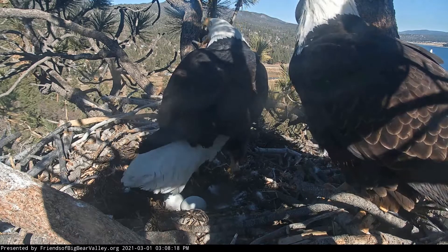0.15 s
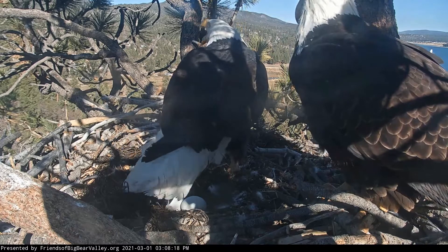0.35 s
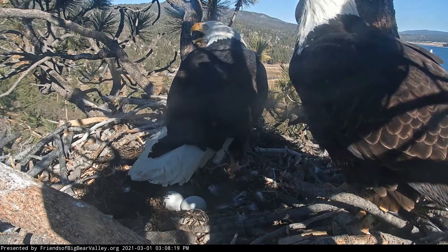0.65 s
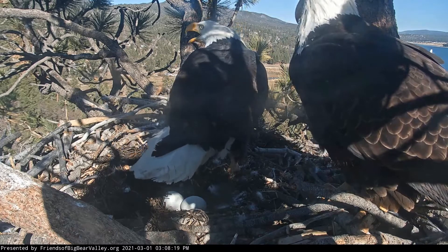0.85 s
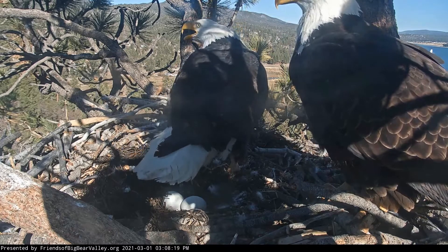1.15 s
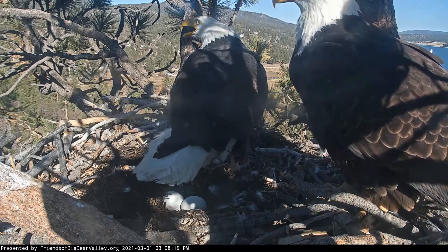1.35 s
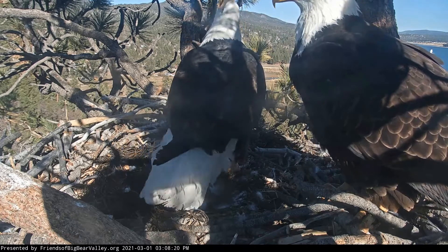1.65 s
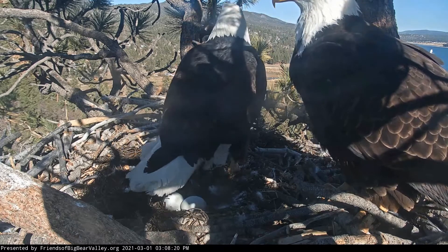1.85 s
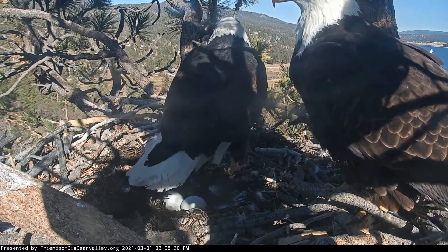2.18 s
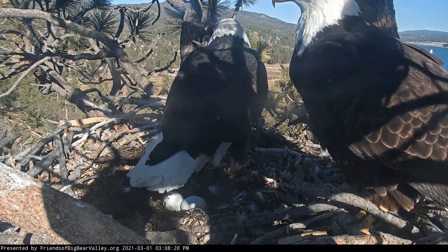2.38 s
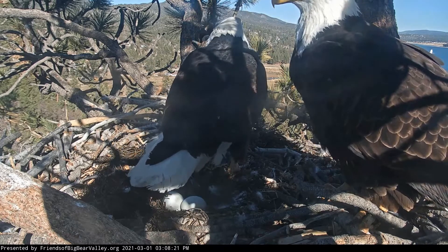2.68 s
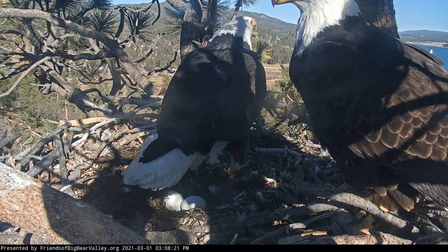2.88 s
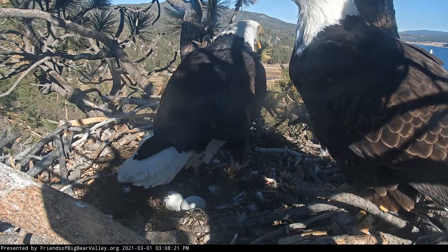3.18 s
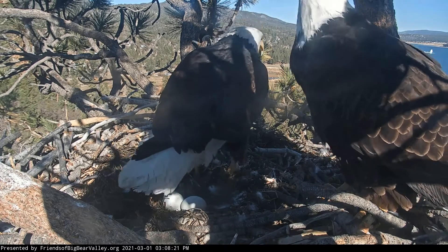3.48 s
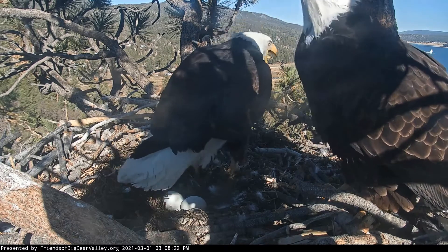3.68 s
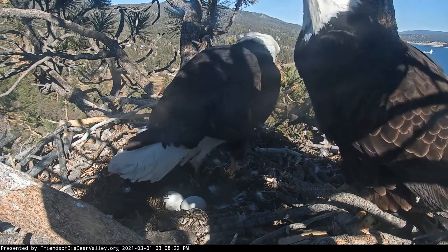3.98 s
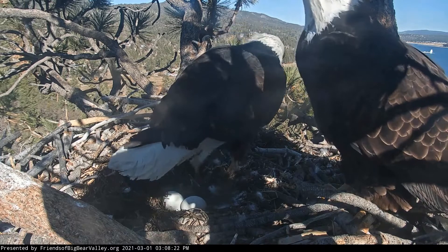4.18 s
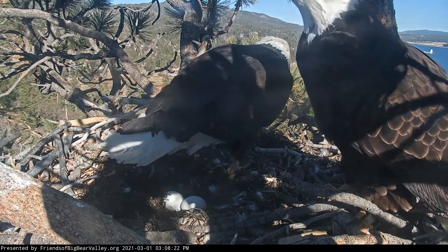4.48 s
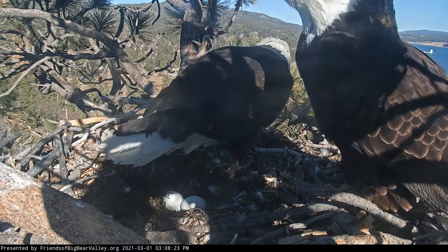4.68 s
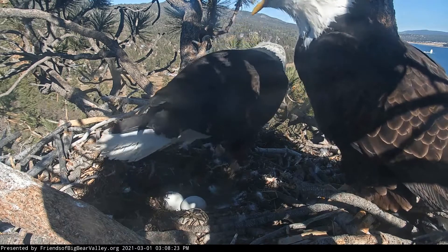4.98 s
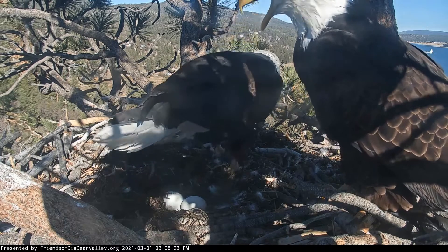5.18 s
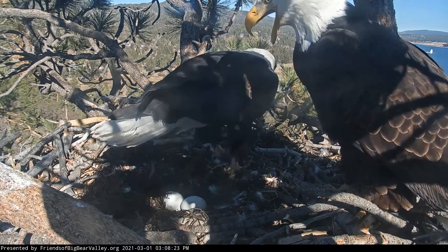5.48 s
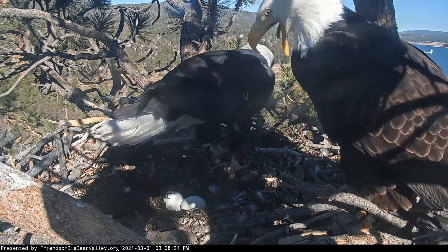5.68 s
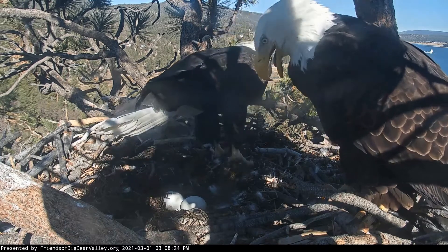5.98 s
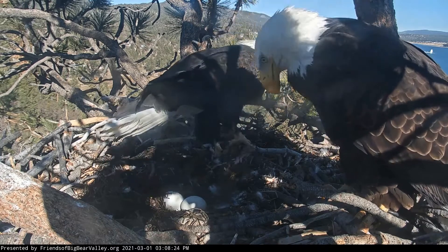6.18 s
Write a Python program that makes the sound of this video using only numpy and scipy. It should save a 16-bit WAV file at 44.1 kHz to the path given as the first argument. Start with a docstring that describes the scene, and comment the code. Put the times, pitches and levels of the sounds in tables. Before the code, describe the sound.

Two bald eagles calling very close in four bursts: piercing pipes, raspy chitters, squeals, low clucks, then loud falling yelps over faint outdoor breeze.

```python
"""Two bald eagles at the nest

Two bald eagles call in four bursts right beside a microphone: pipes, chitters, clucks, squeals and yelps.
Vibrating membranes give the whistles, chopped noise the rasps, short ringing puffs the throat clicks.
Loud calls overload the microphone, which adds hard, mostly odd overtones.
The nest gives short reflections, the forest a faint long echo; a faint far whistle, low breeze and hiss join."""
import sys
import numpy as np
from scipy import signal
from scipy.fft import rfft, irfft
from scipy.io import wavfile

SR = 44100
rng = np.random.default_rng(int(sys.argv[2]) if len(sys.argv) > 2 else 0)


def persist_wave(psi):
    """Save psi, clipped to +-1, as 16-bit WAV."""
    counts = np.round(np.clip(psi, -1, 1) * 32767).astype(np.int16)
    wavfile.write(sys.argv[1], SR, np.atleast_2d(counts).T)


N = 279594

# relative spectra of a rasp's two colours: (frequency [Hz], density [dB per Hz])
GROWL_COLOUR = [(60, -25.5), (180, -14), (500, -10), (1000, -12.5), (1500, -3), (2300, -5.5), (3100, -1.5),
                (3700, -15.5), (5000, -42), (8000, -27.5), (10000, -36.5), (16000, -31.5)]
HISS_COLOUR = [(1000, -37.5), (3500, -7.5), (5000, -1), (6100, 0), (7200, -3), (8000, -19.5), (9000, -40.5),
               (11000, -50), (16000, -43)]


def amp(db):
    """Decibels to gain."""
    return 10 ** (np.asarray(db) / 20)


def unit(x):
    """Scales to rms 1."""
    return x / np.sqrt(np.mean(x ** 2) + 1e-20)


def read(points, hz):
    """Interpolates a table on a log-frequency axis."""
    f, value = np.transpose(points)
    return np.interp(np.log(hz + 1), np.log(f + 1), value)


def add(mix, start_s, sound):
    """Lays a sound into the mix at start_s."""
    part = mix[round(start_s * SR):][:len(sound)]
    part += sound[:len(part)]


def shaped(x, gain):
    """Filters x by gain(Hz), to rms 1."""
    spectrum = rfft(x) * gain(np.fft.rfftfreq(len(x), 1 / SR))
    return unit(irfft(spectrum, len(x)))


def noise(gain, size=8192):
    """Noise of rms 1 whose spectrum follows gain(Hz)."""
    return shaped(rng.standard_normal(size), gain)


def wobble(rate_hz, size=8192):
    """Random motion of rms 1, mostly slower than rate_hz."""
    return noise(lambda f: 1 / (1 + (f / rate_hz) ** 4), size)


def air(air_db, gust_db):
    """A low breeze with an even hiss above it; only the low part follows the gusts."""
    # relative spectrum: (frequency [Hz], density [dB per Hz])
    air_colour = [(15, -56.5), (30, -46), (60, -16.5), (115, -3), (170, -1), (250, -7), (450, -8),
                  (700, -10.5), (1200, -21.5), (2200, -23.5), (4500, -29.5), (8000, -24.5), (13300, -23),
                  (15000, -43.5)]
    # left-right likeness: (frequency [Hz], correlation [0-1])
    air_likeness = [(60, 0.98), (180, 1.0), (550, 0.99), (1650, 1), (4970, 1), (15000, 0.89)]
    # (time [s], level [dB])
    air_level = [(0, -45), (1.3, -47.5), (2.501, -46), (3.101, -47), (4.7, -46), (6.34, -45.5)]
    first, second = (noise(lambda f: amp(read(air_colour, f)), size=N) for _ in range(2))
    alike = np.clip(read(air_likeness, np.fft.rfftfreq(N, 1 / SR)), -1, 1)
    right = irfft(alike * rfft(first) + np.sqrt(1 - alike ** 2) * rfft(second), N)
    both = np.array([first, right])
    level_db = np.interp(np.arange(N) / SR, *np.transpose(air_level))
    breeze = signal.sosfilt(signal.butter(1, 800, fs=SR, output="sos"), both)
    gust_gain = amp(gust_db * wobble(rate_hz=6, size=N))
    return amp(air_db + level_db) * (both + (gust_gain - 1) * breeze)


def far_whistle(waver=0.0053):
    """A faint, slowly rising sine in the distance; its pitch wavers by a small rms share."""
    # (time [s], pitch [Hz])
    far_pitch = [(3.039, 2490), (3.15, 2630), (3.38, 2700)]
    s, hz = np.transpose(far_pitch)
    t = np.arange(N) / SR
    pitch_hz = np.interp(t, s, hz) * (1 + waver * wobble(rate_hz=60, size=N))
    level = amp(-62) * np.interp(t, s, [0, 2, 0])
    return level * np.sin(2 * np.pi * np.cumsum(pitch_hz) / SR)


def surroundings(voice, nest_db, nest_t60_s, forest_db, apart):
    """Sticks and trunk scatter the calls at once; the forest returns them for a second or two."""
    # (frequency [Hz], time to decay by 60 dB [s])
    forest_t60 = [(200, .8), (1100, 1.1), (2200, 1.9), (3100, 2.22), (4000, 2.4), (6000, 0.36),
                  (12000, 0.2)]
    taps = rng.standard_normal((3, 2 * SR))
    taps = taps[0] + apart * taps[1:]  # left and right share most reflections
    t = np.arange(2 * SR) / SR
    nest = taps * amp(-60 * t / nest_t60_s) * (t > .002)

    hz, frame_s, z = signal.stft(taps, SR, nperseg=256)
    decay = amp(-60 * frame_s / read(forest_t60, hz)[:, None])
    forest = signal.istft(z * decay, SR, nperseg=256)[1][:, :len(t)]
    forest *= 1 - np.exp(-t / 0.077)  # builds up gradually

    echo = amp(nest_db) * nest / np.linalg.norm(nest[0])
    echo = echo + amp(forest_db) * forest / np.linalg.norm(forest[0])
    return signal.fftconvolve(voice[None], echo, axes=1)[:, :N]


def swell(length_s, swell_db, rise_s, fall_s):
    """Air pressure through one syllable: soft start, steady swell or fade in dB, soft stop."""
    t = np.arange(min(round(length_s * SR), 8192)) / SR
    ramps = np.array([np.clip(t / rise_s, 0, 1), np.clip((length_s - t) / fall_s, 0, 1)])
    return amp(swell_db * (t / length_s - .5)) * np.prod(np.sin(np.pi / 2 * ramps) ** 2, axis=0)


def membrane(pitch_hz, rough, even_db=0, breath_db=-27, twist_rad=0.87, side_db=-27, side_ratio=1.19):
    """A membrane follows a pitch curve; roughness shakes pitch and strength and lets air leak past."""
    # the throat's weighting of overtones: (frequency [Hz], gain [dB])
    throat = [(500, -3), (750, -6), (1050, -6.5), (1550, 8.5), (2150, -5.5), (3100, -10), (4200, -18),
              (6000, -33), (8000, -45), (11000, -57.5), (16000, -108.5)]
    n = len(pitch_hz)
    k = np.arange(1, 8)[:, None]  # fundamental and six overtones
    jitter = 0.076 * rough * wobble(rate_hz=644)[:n]
    jitter = jitter + (0.0066 + 0.021 * rough) * wobble(rate_hz=160)[:n]
    phase = 2 * np.pi * np.cumsum(pitch_hz * (1 + jitter)) / SR

    lag = twist_rad + 0.27 * wobble(rate_hz=120)[:n]  # overtones lag the fundamental: a lopsided wave
    weight = amp(read(throat, k * pitch_hz) + even_db * (k % 2 == 0)) * (k * pitch_hz < SR / 2)
    tone = np.sum(weight * np.sin(k * phase - (k - 1) * lag), axis=0) / np.linalg.norm(weight, axis=0)
    flutter = amp((-0.87 + 3.24 * rough) * wobble(rate_hz=280)[:n])

    # the other membrane trembles a little higher
    side_tone = amp(side_db) * wobble(rate_hz=200)[:n] * np.sin(side_ratio * phase)
    breath = noise(lambda f: amp(read(GROWL_COLOUR, f)) + 0.24 * amp(read(HISS_COLOUR, f)))[:n]
    return unit(tone * flutter) + side_tone + amp(breath_db + 16.6 * rough) * breath


def whistle(length_s, hz, glide, db, swell_db, rough, arch=0.015, even_db=0, scoop=0, quaver=0,
            rise_s=0.01, fall_s=0.016, side_db=-27):
    """One note glides through hz and sags at both ends; glide, arch, scoop, quaver are shares of pitch."""
    pressure = swell(length_s, swell_db, rise_s / (1 + 3 * rough), fall_s)
    t = np.arange(len(pressure)) / SR
    u = np.linspace(-1, 1, len(pressure))
    bend = glide * u / 2 - arch * u ** 2
    bend = bend - scoop * np.exp(-t / .003)  # hooks up to pitch
    bend = bend + quaver * np.sin(2 * np.pi * 55.2 * t)
    return amp(db) * pressure * membrane(hz * (1 + bend), rough, even_db, side_db=side_db)


def flapping(colour, n, depth_db, rate_hz, ripple_db=4):
    """Air chopped by irregular flaps, through a throat whose narrow resonances differ each time."""
    chopped = rng.standard_normal(8192) * amp(depth_db * np.tanh(wobble(rate_hz)))
    ripple = rng.standard_normal(64)
    ripple_hz = np.linspace(0, SR / 2, len(ripple))

    def throat_gain(f):
        """The colour in dB with random resonances on top."""
        return amp(read(colour, f) + ripple_db * np.interp(f, ripple_hz, ripple))

    return unit(shaped(chopped, throat_gain)[:n])


def rasp(length_s, growl_db, hiss_db, swell_db):
    """A toneless syllable: a coarse growl with a high hiss, both of chopped air."""
    pressure = swell(length_s, swell_db, rise_s=.005, fall_s=0.014)
    growl = flapping(GROWL_COLOUR, len(pressure), depth_db=10, rate_hz=140, ripple_db=5)
    hiss = flapping(HISS_COLOUR, len(pressure), depth_db=5, rate_hz=150, ripple_db=4)
    return pressure * (amp(growl_db) * growl + amp(hiss_db) * hiss)


def click(db, centre_hz, decay_s, sharpness=1.16, top_hz=3700, muffle_hz=4600):
    """A puff that rings briefly in the throat, which muffles its sharp start."""
    def ring(f):
        """A resonance at centre_hz, cut above top_hz."""
        return 1 / (1 + (sharpness * np.log((f + 1) / centre_hz)) ** 2) ** 2 / (1 + (f / top_hz) ** 8)

    puff = noise(ring)
    t = np.arange(len(puff)) / SR
    burst = puff * np.exp(-t / decay_s) * (1 - np.exp(-t / 0.000067))
    muffle = signal.butter(4, muffle_hz, fs=SR, output="sos")
    return amp(db) * signal.sosfilt(muffle, burst)


def opening(start_s, db, hz, decay_s):
    """The throat opens with a faint tick, then a click."""
    return [(start_s - .005, click(db - 20.5, hz, decay_s)), (start_s, click(db, hz, decay_s))]


def early_click(note_s, db):
    """The opening of a pipe or cluck, its click 6.8 ms ahead of the note."""
    return opening(note_s - 0.0068, db, hz=1810, decay_s=0.0026)


def squeal(*points):
    """One long push of air drives the membrane up through its registers."""
    s, hz, db, rough = np.transpose(points)
    pressure = swell(s[-1] - s[0], 0, rise_s=.004, fall_s=.006)
    t = s[0] + np.arange(len(pressure)) / SR
    voice = membrane(np.interp(t, s, hz), np.interp(t, s, rough))
    return [(s[0], pressure * amp(np.interp(t, s, db)) * voice)]


def cluck(start_s, length_s, hz, glide, db, swell_db, rough, even_db, click_db):
    """A click, then a low falling note whose even overtones, if strong, tip it towards its octave."""
    note = whistle(length_s, hz, glide, db, swell_db, rough, arch=.015, even_db=even_db)
    return early_click(start_s, click_db) + [(start_s, note)]


def chitter(start_s, hiss_db, growl_db, click_db, click_hz, thin_hz=450, grain_db=3, grain_hz=130):
    """A click and a squeak start a thin, stuttering rasp; a softer click closes it."""
    click_decay_s = 0.0069
    thin = signal.butter(2, thin_hz, "high", fs=SR, output="sos")
    body = signal.sosfilt(thin, rasp(0.075, growl_db, hiss_db, swell_db=-15.5))
    grain = unit(amp(grain_db * wobble(grain_hz)[:len(body)]))
    squeak = whistle(.018, hz=6480, glide=-.14, db=hiss_db + 9.5, swell_db=5.5, rough=0.63)
    return [(start_s, click(click_db, click_hz, click_decay_s)),
            (start_s, squeak),
            (start_s, body * grain),
            (start_s + .056, click(click_db - 11.5, click_hz, click_decay_s))]


def yelp(start_s, drop_s, length_s, hz, glide, db, scrape_swell_db, click_db):
    """A click and a high rough scrape, then the voice drops to a clear quavering note that stops short."""
    overlap_s = 0.0154
    scrape = whistle(drop_s + overlap_s, hz * 1.34, glide=-0.0442, db=-6, swell_db=scrape_swell_db, rough=0.69)
    note = whistle(length_s, hz, glide, db, swell_db=-6.5, rough=0.131, arch=0.0037,
                   quaver=0.0089, fall_s=0.0059)
    clicks = opening(start_s + 0.0036, click_db, hz=2100, decay_s=0.0062)
    return clicks + [(start_s, scrape), (start_s + drop_s, note)]


def pipe(start_s, length_s, hz, glide, db, swell_db, rough, click_db):
    """The throat clicks open, then a short rounded note sounds, frayed by the other membrane."""
    note = whistle(length_s, hz, glide, db, swell_db, rough, arch=0.0028, scoop=.08,
                   rise_s=0.012, fall_s=0.015, side_db=-23)
    return early_click(start_s, click_db) + [(start_s, note)]


def eagles():
    """Every call of both birds, each made of timed parts."""
    # bare whistles, mostly the second side of the syrinx sounding with another call: (start [s],
    # length [s], pitch [Hz], glide [share], level [dB], swell [dB], roughness [0-1])
    whistle_rows = [ (0.148, 0.04, 4100, 0.11, -23.5, 25, 0.43),
                    (0.213, 0.038, 4195, 0.086, -18, -29, 0.24), (0.228, 0.05, 6230, -0.11, -27, 7, 0.7),
                    (0.492, 0.079, 4120, -0.023, -26, -9, 0.43), (0.733, 0.044, 3167, 0.039, -15, -2, 0.17),
                    (1.746, 0.067, 960, 0.37, -22.5, -9, 0.8), (1.747, 0.087, 2100, .2, -19, 9, 0.66),
                    (1.751, 0.068, 2893, 0.064, -13.5, -2, 0.64), (3.49, 0.02, 1412, -0.2, -10.5, 3, 0.71),
                    (3.509, 0.022, 3378, 0.044, 4, -3, 0.01), (3.526, 0.067, 4150, -.02, -13, -3, 0.11),
                    (3.855, 0.047, 4000, -0.14, -27.5, -16, 0.27),
                    (4.006, 0.044, 1566, 0.16, -11.5, 12, 0.5), (4.041, 0.036, 3430, 0, -7, -17, 0.04),
                    (4.087, 0.037, 3310, -0.081, -9, 10, 0.47),
                    (4.219, 0.056, 4000, -0.086, -21.5, 3, 0.33),
                    (5.09, 0.039, 1630, 0.094, -1.5, -5, 0.24), (5.108, 0.043, 2133, 0.0073, 0.5, 0, 0.09),
                    (5.168, .018, 3920, 0.48, -14.5, -12, 0.77), (5.242, 0.012, 3470, .1, 4, -15, 0.32),
                    (5.25, 0.031, 3710, 0.456, -17.5, -8, 0.3), (5.942, 0.054, 2021, -0.084, -2, -20, 0.4)]
    # coarse bodies of harsh calls: (start [s], length [s], growl [dB], high hiss [dB], swell [dB])
    growl_rows = [ (0.122, 0.059, -33.5, -57, 15), (1.686, 0.061, -24.5, -72, 12),
                  (1.749, 0.14, -20.5, -39.5, 13.5), (3.386, 0.063, -25.5, -45, 24),
                  (3.507, 0.093, -13.5, -35, -3), (4.039, 0.085, -10.5, -38, 2),
                  (5.093, 0.061, -5, -15.5, -7.5), (5.924, 0.071, -14.5, -36, 18)]
    # clicks of the creak that ends the first squeal: (time [s], level [dB])
    creak_rows = [(1.832, 6.5), (1.846, 3.5), (1.857, -0.5), (1.867, -5), (1.884, 3.5), (1.900, -11),
                  (1.918, -10), (1.944, -26.5)]
    # three squeals, lists of points: (time [s], pitch [Hz], level [dB], roughness [about 0-1])
    squeal_rows = [
        [(1.702, 3500, -31, 0.6), (1.715, 4450, -17.5, 0.8), (1.726, 5400, -33, 1.06),
         (1.744, 6000, -22.5, 0.7), (1.752, 7000, -12, .3), (1.777, 8100, -25, 0.03), (1.799, 6100, -23, 0.3),
         (1.812, 7800, -18, 0.8), (1.831, 7650, -19, 0.5)],
        [(3.396, 1418, -33.5, 0.77), (3.416, 1782, -22.5, 0.15), (3.421, 3114, 1, 0.31),
         (3.430, 3268, -1, 0.22), (3.436, 2790, -26, .55), (3.446, 3120, -15, 0.7), (3.450, 5450, -18, 0.29),
         (3.502, 6290, -9, 0.25), (3.513, 5900, -14, 0.54)],
        [(3.931, 1492, -16.5, 0.6), (3.944, 1774, -7.5, 0.65), (3.948, 2256, -5, 0.28), (3.964, 2617, 12, 0.26),
         (3.980, 2670, -3.5, 0.01), (3.988, 2934, -18.5, 0.65), (3.996, 3330, -13, 0.46),
         (3.999, 5824, -13.5, .15), (4.030, 6500, -15, 0.06), (4.044, 5470, -4, .3)],
    ]
    # (start [s], length [s], pitch [Hz], glide [share], level [dB], swell [dB], roughness [0-1],
    # even overtones [dB], click [dB])
    cluck_rows = [ (.880, 0.014, 1140, -0.13, -20, -1, 0.24, -6, -45),
                  (2.331, .028, 619, -0.15, -11.5, 37, 0.14, 13.5, -33),
                  (2.458, 0.031, 508, -0.21, -18, -11, 0, 5, -60),
                  (2.556, 0.091, 1036, -.16, -6.5, -20.5, 0.01, -0.5, -16),
                  (5.962, 0.03, 1182, -0.319, -5.5, 5, 0.39, 3, -15),
                  (6.142, 0.02995, 1242, -0.22, 5, 0.5, 0.2, 14, -6)]
    # (start [s], hiss [dB], growl [dB], click [dB], click centre [Hz])
    chitter_rows = [ (.287, -24.5, -33.5, -17.5, 940), (.385, -27.5, -29, -17, 900),
                    (.491, -34, -38.5, -23.5, 840), (3.613, -30, -34.5, -14, 2200),
                    (3.710, -30, -32.5, -16.5, 2090), (3.821, -37.5, -40, -11, 2730)]
    # (start [s], drop after [s], note length [s], note pitch [Hz], glide [share], note level [dB],
    # scrape swell [dB], click [dB])
    yelp_rows = [ (5.183, 0.0096, 0.059, 2865, 0.0087, 1, -4, -14.5),
                 (5.280, 0.0076, 0.053, 2913, 0.024, 4, -3, 0),
                 (5.383, .012, 0.05, 2297, -0.055, 4, -16, -0.5),
                 (5.497, 0.017, 0.039, 2281, -0.068, 8, -3, -3.5),
                 (5.625, .02, .04, 2254, -0.071, 7, -6.5, -10.5),
                 (5.772, 0.017, 0.036, 2277, -0.084, 6, 20, -11.5)]
    # (start [s], length [s], pitch [Hz], glide [share], level [dB], swell [dB], roughness [0-1], click [dB])
    pipe_rows = [ (.188, .029, 4007, -0.0067, -2, -8, 0.01, -18.5),
                 (.616, .04, 3980, -0.045, -3.5, -4, .06, -16.5),
                 (.734, 0.053, 3934, -0.043, -13.5, -19, 0.16, -17.5),
                 (.856, 0.028, 2960, -0.036, -2.5, -9, .07, -17),
                 (.962, .03, 3016, 0.031, 0, -1.5, 0.17, -12.5),
                 (2.085, 0.034, 3111, -.02, -2.5, -5.5, 0.13, -8),
                 (2.210, 0.032, 3114, -.02, -0.5, -0.5, 0.09, -9.5),
                 (4.219, 0.035, 3216, 0.047, -15.5, -5, 0.31, -15.5),
                 (4.398, 0.029, 3670, 0.043, -19, 10, 0.48, -23.5)]

    parts = [(s, whistle(*shape)) for s, *shape in whistle_rows]
    parts += [(s, rasp(*shape)) for s, *shape in growl_rows]
    # harder clicks ring higher
    parts += [(s, click(db, centre_hz=2730 + 45.5 * db, decay_s=0.0024)) for s, db in creak_rows]
    calls = [(squeal_rows, squeal), (cluck_rows, cluck), (chitter_rows, chitter),
             (yelp_rows, yelp), (pipe_rows, pipe)]
    for rows, call in calls:
        for row in rows:
            parts += call(*row)

    voice = np.zeros(N)
    for start_s, sound in parts:
        add(voice, start_s, sound)
    return voice


def scene():
    """The calls, their echoes and the far whistle at the microphone."""
    voice = eagles()
    echoes = surroundings(voice, nest_db=-8, nest_t60_s=0.051, forest_db=-45.5, apart=0.2)
    return voice + echoes + far_whistle()


def record(dry, ceiling=0.51, lopsided=0.0032, knee=7, thump_db=-15, thump_hz=170):
    """The input overloads a little unevenly, the microphone colours it; air and band limit follow."""
    # the microphone's bright colour, with a hollow near 4.8 kHz: (frequency [Hz], gain [dB])
    mic_colour = [(20, -23.5), (45, -9), (85, -4.5), (170, 7.5), (600, -0.5), (3000, -2.5), (4150, -3.5),
                  (4750, -4.5), (5900, 2), (7000, 1.5), (8800, 5), (12000, 7), (14500, 3.5), (15800, -5.5)]
    fine = signal.resample_poly(dry, 2, 1, axis=1)  # twice the rate, against aliasing
    limit = ceiling * (1 + lopsided * np.sign(fine))
    squashed = fine / (1 + abs(fine / limit) ** knee) ** (1 / knee)
    clipped = signal.resample_poly(squashed, 1, 2, axis=1)

    # the rectified excess gives low thumps
    bass = signal.butter(2, [thump_hz / 2, thump_hz * 1.35], "band", fs=SR, output="sos")
    clipped = clipped + amp(thump_db) * signal.sosfilt(bass, abs(dry - clipped))

    # minimum-phase filter
    log_gain = np.log(amp(read(mic_colour, abs(np.fft.fftfreq(4096, 1 / SR)))))
    colour = np.fft.ifft(np.exp(np.conj(signal.hilbert(log_gain)))).real[:2048]
    coloured = signal.oaconvolve(clipped, colour[None])[:, :N]

    heard = (coloured + air(air_db=0.0, gust_db=3.0)) * amp([[-.55], [0]])  # left slightly softer
    band_limit = signal.firwin(301, 15900, window=("kaiser", 8), fs=SR)
    return signal.oaconvolve(heard, band_limit[None], "same")


dry = scene()
out = record(dry)
persist_wave(out)
```